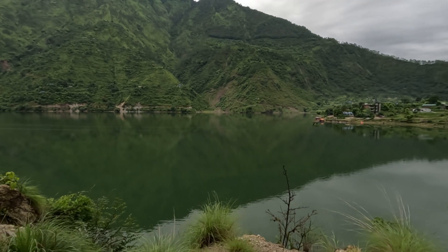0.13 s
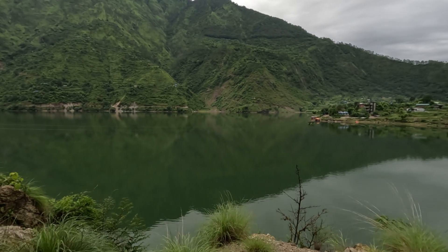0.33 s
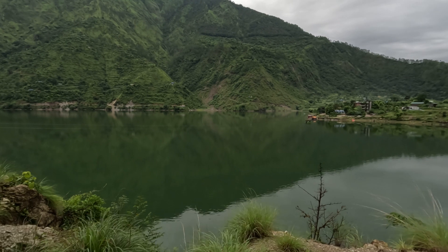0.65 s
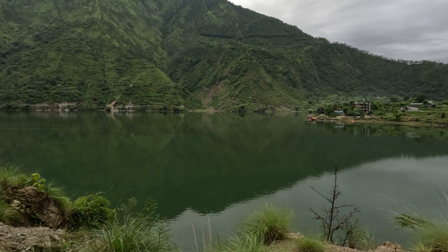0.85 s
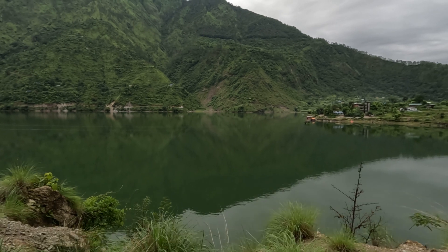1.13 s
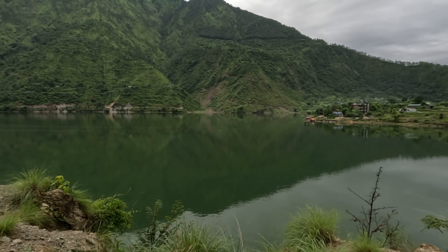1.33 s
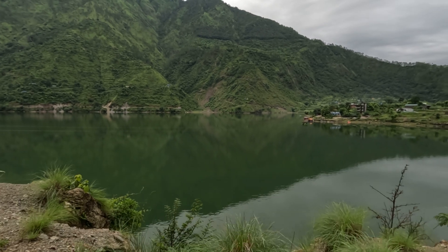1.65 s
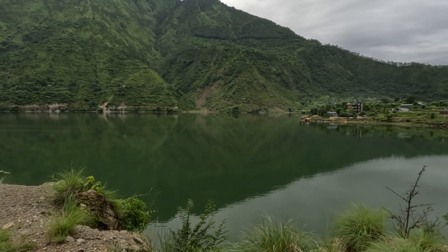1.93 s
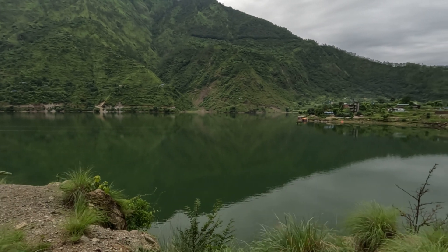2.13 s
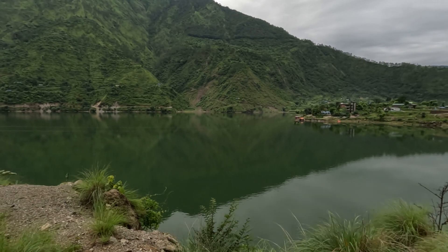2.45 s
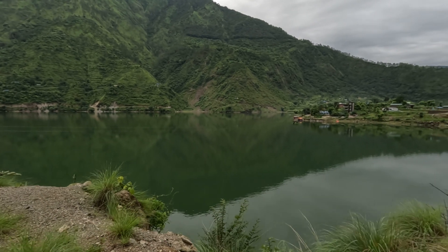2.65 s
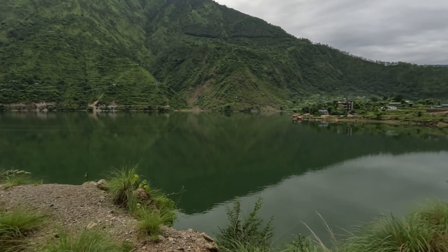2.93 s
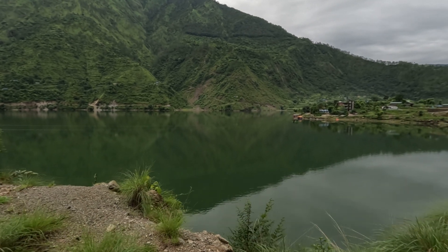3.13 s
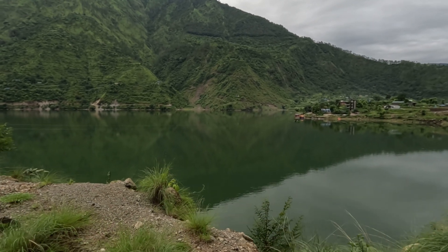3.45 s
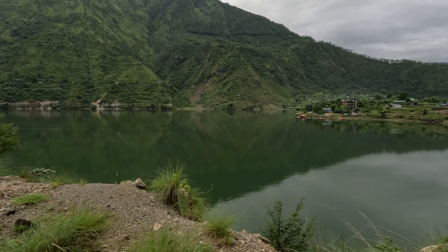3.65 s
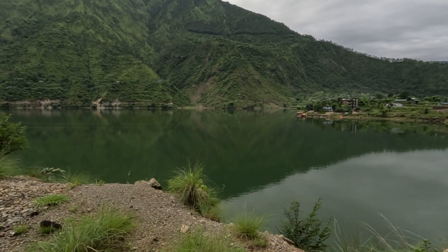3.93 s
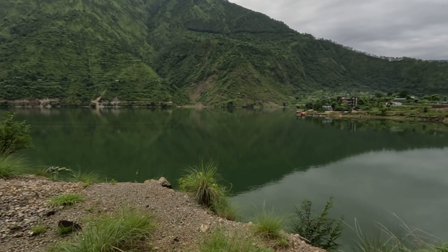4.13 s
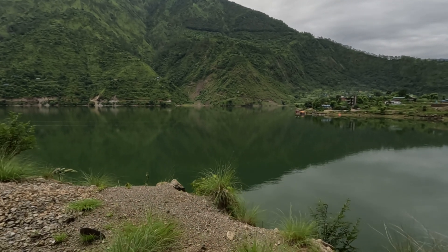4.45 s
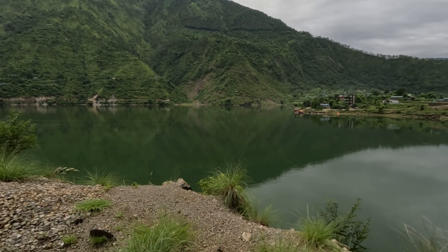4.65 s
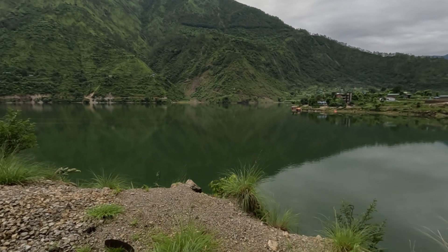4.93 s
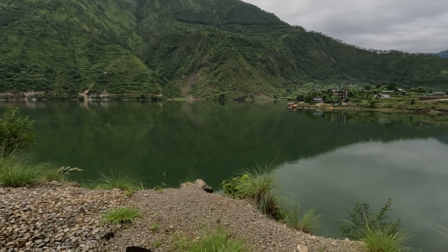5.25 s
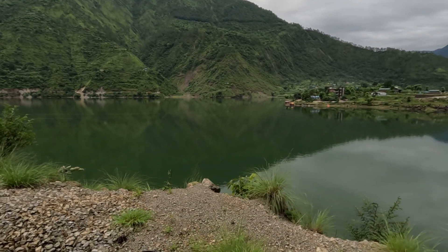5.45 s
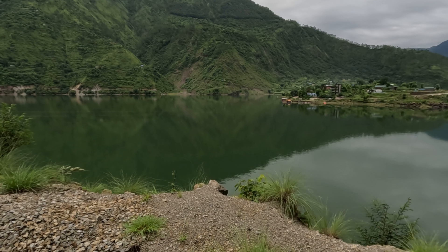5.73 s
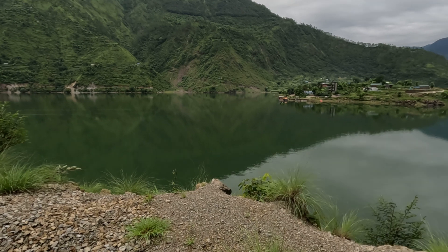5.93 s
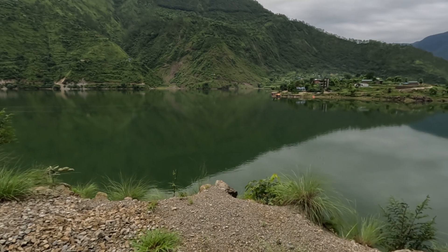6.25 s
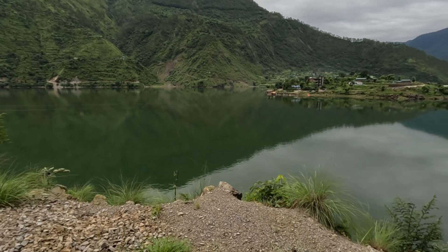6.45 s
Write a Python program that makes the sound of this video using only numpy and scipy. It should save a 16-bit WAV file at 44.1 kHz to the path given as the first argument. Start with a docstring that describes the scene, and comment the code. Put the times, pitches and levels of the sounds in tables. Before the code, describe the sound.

Someone walks steadily on loose grit and small stones outdoors, heel and toe crunching, beneath a constant thin, high whine of crickets.

```python
"""A near cricket chirps over a farther chorus, grass and rumbling air: arching tones over coloured noise.
From about half a second, even steps crush grit on a lakeside path: clumped ringing grains, knocked pebbles, thuds.
A far bird twitters in gliding sines; a lower cricket joins at 1.5 s, and the near one falls behind by 2.7 s.
The steps and chorus go on to the end; from mid-scene trouser cloth swishes faintly in swells of noise."""
import sys
import numpy as np
from scipy import signal
from scipy.fft import rfft, irfft, next_fast_len
from scipy.io import wavfile
from scipy.ndimage import uniform_filter1d

SR = 44100
rng = np.random.default_rng(int(sys.argv[2]) if len(sys.argv) > 2 else 0)


def int16_out(signal):
    """Quantize to a 16-bit WAV file."""
    q = np.round(np.clip(np.atleast_2d(signal).T, -1, 1) * 32767)
    wavfile.write(sys.argv[1], SR, q.astype(np.int16))


N = 290619
TIME = np.arange(N) / SR

# footfalls: [heel t/s, toe t/s, heel attack/s, heel crunch level/dB, toe crunch level/dB,
#             heel sand level/dB, toe sand level/dB, sole scuff level/dB, air sway level/dB]
FOOTFALLS = [(0.549, 0.634, 0.014, -53, -52, -55.5, -55, -56.5, -53),
             (1.128, 1.215, 0.0052, -44.5, -50, -50, -60, -49.5, -45.5),
             (1.752, 1.832, 0.031, -47, -51, -62, -56, -52, -51.5),
             (2.347, 2.440, 0.031, -46.5, -51, -59, -59, -49.5, -54),
             (2.914, 3.019, 0.011, -43.5, -54, -47.5, -60, -47, -65),
             (3.545, 3.648, 0.0086, -47, -43.5, -54, -54, -52, -51.5),
             (4.14, 4.271, 0.0089, -44, -47.5, -52, -52, -49, -58),
             (4.799, 4.886, 0.014, -40, -75, -50.5, -66, -51, -51.5),
             (5.408, 5.534, 0.022, -51, -48.5, -62, -51, -52, -55),
             (6.099, 6.201, 0.015, -46.5, -55.5, -57.5, -63, -51.5, -52)]
# pebble knocks: [t/s, peak level/dB before panning, ring f/Hz, left over right/dB, ring length/cycles]
PEBBLE_KNOCKS = [(0.052, -36, 3500, 6, 5.5), (0.394, -30.5, 3070, 5, 8.4), (0.448, -33.5, 3000, 7, 3),
                 (0.516, -33, 5500, 5, 3.3), (0.587, -35, 1190, 10, 3.7), (0.625, -31, 2940, 2, 3.1),
                 (0.797, -47.5, 350, 4.5, 6.4), (0.895, -38.5, 3830, 3, 9.3), (1.022, -32, 2260, 6, 3.5),
                 (1.095, -32.5, 4050, 2, 3.7), (1.116, -31, 585, 5, 4.1), (1.131, -22.5, 3940, 1, 6.1),
                 (1.16, -22.5, 1350, 6, 1.4), (1.22, -32.5, 1780, 6.5, 2.6), (1.665, -31, 2520, 9, 6),
                 (1.671, -27.5, 2800, 2, 4.9), (1.748, -26.5, 970, 9, 3.9), (1.813, -32.5, 1900, 10, 6.4),
                 (1.926, -35, 1080, 7, 2.4), (2.326, -32.5, 2020, 12, 1.9), (2.366, -33.5, 416, 3, 3.3),
                 (2.379, -35.5, 1280, 16, 2), (2.416, -26, 2230, 6.5, 6.7), (2.443, -25.5, 1934, 11, 3),
                 (2.916, -30.5, 780, 10, 2.1), (2.942, -31, 2980, 8, 3.5), (3.011, -31.5, 5200, -4, 3),
                 (3.315, -33, 1425, 1, 16), (3.543, -39.5, 552, 5, 4.1), (3.627, -23, 3400, 1, 6),
                 (3.641, -19.5, 2600, 3, 5.6), (4.164, -32, 2130, 15, 3), (4.18, -35, 1010, 10, 6.8),
                 (4.24, -31, 1490, 5, 3.1), (4.271, -18, 2090, 6, 4.4), (4.801, -26.5, 3000, 8, 4.5),
                 (4.889, -33, 1870, 5, 8.7), (5.095, -26.5, 2330, 5.5, 2.5), (5.496, -34.5, 1380, 7, 7.5),
                 (5.539, -37, 2660, -4, 4), (6.087, -30.5, 1440, 4, 9.7), (6.191, -33, 1290, 4.5, 11),
                 (6.269, -31, 1190, 5, 4.2), (6.387, -23.5, 6000, 1, 3.6), (6.392, -47.5, 406, 1, 5),
                 (6.484, -24, 1320, 4.5, 4), (6.506, -40, 1210, 0, 15), (6.511, -42.5, 370, 1, 11)]
# soft low thuds: [t/s, drive level/dB, f/Hz, spread/s]
WEIGHT_THUDS = [(0.074, -49.5, 30, 0.052), (0.215, -44, 107, 0.043), (0.53, -50.5, 169, .012),
                (1.255, -44, 78, 0.028), (1.385, -44.5, 32.2, 0.014), (1.9, -50.5, 65, 0.06),
                (2.385, -40.5, 73, 0.025), (2.625, -49, 200, 0.0076), (2.92, -49.5, 156, 0.014),
                (3.555, -44.5, 184, 0.015), (4.095, -40.5, 69.1, 0.01), (4.362, -50.5, 170, 0.0083),
                (4.816, -49.5, 162, 0.022), (5.509, -38.5, 77.5, 0.011), (6.258, -48.5, 79, 0.032),
                (6.465, -44.5, 55, 0.0072)]
# trouser legs brushing past each other: [t/s, level/dB, spread/s]
CLOTH_SWISHES = [(3.34, -58, 0.035), (4.65, -65, 0.041), (5.75, -63.5, 0.062), (6.447, -62.5, 0.041)]
# swinging leg brushing the grass: [t/s, level/dB before the hiss and tick mix, spread/s]
LEG_BRUSHES = [(0.008, -57.5, 0.13), (0.316, -61, 0.063), (0.439, -54.5, 0.08), (0.709, -63, 0.03),
               (1.096, -57.5, 0.034), (1.312, -61, 0.1), (1.68, -58, 0.17), (1.914, -63.5, 0.042),
               (2.163, -64.5, 0.099), (2.51, -61.5, 0.049), (2.755, -58.5, 0.057), (3.13, -68.5, 0.086),
               (3.365, -65.5, 0.091), (3.722, -59, 0.03), (3.96, -70.5, 0.24), (4.33, -62, 0.035),
               (4.687, -68, .04), (4.955, -59, 0.02), (5.11, -69.5, 0.06), (5.29, -66.5, 0.14),
               (5.57, -60.5, 0.035), (5.95, -68.5, .06), (6.294, -59.5, 0.054), (6.552, -56, 0.033)]
# dry grass stems snapping by the left ear: [t/s, peak level/dB before panning]
STEM_SNAPS = [(.301, -49), (0.349, -43), (0.899, -44.5), (1.713, -53), (1.951, -52), (2.015, -43.5),
              (3.015, -54), (5.054, -49), (6.299, -56)]
# runs of the nearest cricket: [first chirp t/s, last chirp t/s]
NEAR_CRICKET_RUNS = [(0.015, 0.326), (0.477, 0.709), (0.859, 1.327), (1.475, 1.475), (1.626, 2.251),
                     (2.404, 2.404), (2.525, 2.68)]
# its level as the walker passes and leaves it behind: [t/s, level/dB]
NEAR_CRICKET_LEVEL = [(0, -50.5), (0.46, -50.5), (0.6, -46.5), (0.86, -46), (1.12, -53), (1.65, -45.5),
                      (2.1, -53.5), (2.42, -51), (2.7, -63)]
# runs of the lower cricket: [first chirp t/s, last chirp t/s, level/dB]
LOWER_CRICKET_RUNS = [(1.512, 1.762, -56.5), (2.369, 3.27, -54.5), (3.381, 4.22, -55), (4.32, 4.659, -56),
                      (4.73, 5.655, -55.5), (5.746, 6.081, -59), (6.176, 6.502, -57.5)]
# one wing stroke at even moments: [f/Hz from the top pitch, level/dB]
WING_STROKE = [(-380, -44), (-170, -12.5), (-31, -8.5), (10, -3.5), (-39, 2.5), (-260, 2.5), (-540, -11),
               (-850, -80)]
# level of the cricket chorus along the way: [t/s, level/dB]
CHORUS_LEVEL_PATH = [(0, -55), (0.75, -58), (1.4, -59.5), (2.1, -56.5), (3.2, -58), (4.5, -58.5),
                     (5.8, -60.5), (6.59, -60)]
# far bird whistles: [centre t/s, length/s, start f/Hz, end f/Hz, level/dB]
BIRD_WHISTLES = [(0.842, .08, 3650, 3670, -71), (0.927, 0.026, 3650, 4000, -62),
                 (.952, 0.023, 2980, 2870, -62), (1.985, 0.029, 3850, 3800, -66),
                 (2.026, 0.063, 3600, 3240, -65), (2.089, 0.087, 3400, 3240, -65),
                 (2.128, .05, 3100, 2730, -65)]

# tone colours of grit, sand, scuffed soil, thud rumble and cloth: [f/Hz, relative level/dB per Hz]
CRUNCH_COLOUR = [(500, -40), (800, -15), (1050, 6.5), (1600, 3), (2700, 3), (3800, -2.5), (6000, -49),
                 (15000, -72)]
SAND_COLOUR = [(2000, -12), (3500, 6), (5500, 9), (7500, 2.5), (9000, -8), (12000, -6), (15000, -31)]
SCUFF_COLOUR = [(120, 7), (220, 0), (400, -6.5), (700, -5), (1100, -7.5), (2000, -38), (8000, -55)]
THUD_COLOUR = [(30, 10), (70, -2.5), (150, -0.5), (230, -6.5), (400, -20), (900, -69)]
CLOTH_COLOUR = [(600, -55), (1050, -12), (1350, 10), (1550, 6), (1900, -22), (3000, -3), (6000, -77)]
# tone colours of wind, valley hum, grass and very distant crickets: [f/Hz, relative level/dB per Hz]
WIND_COLOUR = [(20, 5.5), (35, -8), (50, -10), (75, -27.5), (130, -31.5), (400, -70)]
VALLEY_COLOUR = [(40, -22.5), (100, -9.5), (180, 3), (270, -6.5), (420, -7), (750, -15.5), (1200, -8),
                 (3000, -43.5)]
GRASS_COLOUR = [(500, -8.5), (850, -13), (1200, -1), (2000, -2), (3200, -3.5), (4500, -9.5), (6500, -7.5),
                (9000, -21.5), (12000, -23), (15000, -47)]
HAZE_COLOUR = [(6200, -28), (7000, -5), (7400, 3.5), (7700, 4), (8100, -10), (8500, -11), (9200, -31),
               (11000, -66)]
# left-right likeness of steps and air, held within 0 to 0.99 in use: [f/Hz, likeness]
STEP_WIDTH = [(200, 0.8), (1500, .93), (4000, 0.74), (8000, 1.1), (12000, -6.5)]
AIR_WIDTH = [(30, 0.56), (200, 0.74), (1500, 0.45), (5000, .5), (12000, 0.025)]
# stereo balance of steps and air: [f/Hz, left over right/dB]
STEP_BALANCE = [(60, -3.5), (150, -0.5), (300, -1.5), (600, 5.5), (2000, 8.5), (4000, 2), (7500, 1.5),
                (10000, 3), (12000, 23)]
AIR_BALANCE = [(30, -0.5), (160, -2), (500, -1), (1500, 3), (4000, 2), (8000, -4), (10000, 6.5),
               (12000, 24)]

HEEL_FADE_S, TOE_ATTACK_S, TOE_FADE_S = 0.056, 0.026, 0.021  # time constants of the two contacts
SCUFF_FADE_S, TOE_SCUFF_DB = 0.036, -15  # the toe scuffs less than the heel
SWAY_LAG_S, SWAY_SPREAD_S, BREEZE_DB = 0.058, 0.077, -53.5  # the body sways after the toe lands
GRASS_DB = -68  # grass left alone, before the hiss and tick mix
STROKE_S, NEAR_PERIOD_S, LOWER_PERIOD_S = 0.052, 0.078, 0.084  # periods stretch slightly to fit each run
TICKS_PER_S, TICK_DB = 30, -70.5
CUTOFF_HZ = 15100


def from_db(db):
    """Turn decibels into an amplitude gain."""
    return 10 ** (np.asarray(db) / 20)


def rms_one(x):
    """Bring a sound to an rms level of one."""
    return x / np.sqrt(np.mean(x ** 2) + 1e-20)


def at_hz(points, hz):
    """Read a table on a log-frequency axis."""
    f, value = np.transpose(points)
    return np.interp(np.log(np.maximum(hz, 1)), np.log(f), value)


def at_time(points, t):
    """Read a level path in dB at time t."""
    return np.interp(t, *np.transpose(points))


def panned(pan_db):
    """Left and right gains with a mean of one; positive dB leans left."""
    gains = from_db(np.array([[.5], [-.5]]) * pan_db)
    return gains / gains.mean(axis=0)


def drift(rate):
    """Smooth random wander of rms 1, with rate knots per second."""
    knots = rng.standard_normal(1024)
    return rms_one(np.interp(TIME * rate, np.arange(len(knots)), knots))


def coloured(sources, spectrum, likeness, pan):
    """Two unrelated sources become one stereo sound with a causal tone colour; rms 1."""
    size = next_fast_len(N + 8192)
    hz = np.arange(size // 2 + 1) * SR / size
    # folding the cepstrum forward makes the filter causal; the overall gain is normalised below
    cepstrum = irfft(np.log(from_db(at_hz(spectrum, hz))), size)
    tone = np.exp(rfft(2 * cepstrum[:size // 2], size))
    tone = tone * hz / np.hypot(hz, 15)  # roll off below 15 Hz
    alike = np.clip(at_hz(likeness, hz), 0, .99)
    mid, side = rfft(sources, size)
    pair = np.sqrt(1 + alike) * mid + np.sqrt(1 - alike) * side * [[1], [-1]]
    stereo = pair * tone * panned(at_hz(pan, hz))
    return rms_one(irfft(stereo, size)[:, :N])


def air(spectrum):
    """Diffuse smooth noise."""
    return coloured(rng.standard_normal((2, N)), spectrum, AIR_WIDTH, AIR_BALANCE)


def grains(spectrum, per_s, spread_db):
    """Tiny fractures clump, many weak and a few strong; each rings briefly at the pitch of its own grain."""
    born = rng.random(N) < per_s * from_db(3 * drift(70)) / SR
    clicks = born * from_db(spread_db * np.minimum(rng.exponential(1, N), 4))
    # even out the local power so the contacts alone shape the level
    clicks /= np.sqrt(np.abs(uniform_filter1d(clicks ** 2, size=2000)) + 1e-4)
    clicks = clicks * rng.choice([-1, 1], (2, N))
    pitches_hz = np.geomspace(350, 8500, num=10)
    kinds, out = rng.integers(0, len(pitches_hz), N), 0
    for kind, hz in enumerate(pitches_hz):
        body = signal.butter(1, [hz / 1.25, hz * 1.25], "band", fs=SR)
        out = out + signal.lfilter(*body, clicks * (kinds == kind) + 1e-18)
    return coloured(out, spectrum, STEP_WIDTH, STEP_BALANCE)


def add(out, sound, s):
    """Mix a short sound in at time s."""
    start = int(round(s * SR))
    first, last = max(start, 0), min(start + sound.shape[-1], N)
    if last > first:
        out[..., first:last] += sound[..., first - start:last - start]


def scatter(x, t60, wet_db):
    """Ground and grass return a short diffuse tail, different at each ear."""
    t = np.arange(SR // 4) / SR
    tail = rng.standard_normal((2, len(t))) * from_db(-60 * t / t60)
    tail /= np.sqrt(np.sum(tail ** 2, axis=1, keepdims=True))
    return x + from_db(wet_db) * signal.fftconvolve(np.atleast_2d(x), tail, axes=1)[:, :N]


def contact(s, attack_s, fade_s):
    """Pressure builds up to time s and dies away."""
    return np.exp(-np.minimum(np.maximum((s - TIME) / attack_s, (TIME - s) / fade_s), 20))


def swell(s, spread_s):
    """A smooth rise and fall around time s."""
    return np.exp(-np.minimum(.5 * ((TIME - s) / spread_s) ** 2, 20))


def beats(first, last, period):
    """Evenly spaced moments from first to last."""
    return np.linspace(first, last, 1 + int(round(abs(last - first) / period)))


def cricket(chirps, top_hz, wobble_hz, fade_db=0):
    """Each wing stroke speeds up and slows down, so its near-pure tone arches in pitch as it fades."""
    stroke, out = np.linspace(0, 1, int(STROKE_S * SR)), np.zeros(N)

    def along(values):
        """Spread values evenly over the stroke."""
        return np.interp(stroke, np.linspace(0, 1, len(values)), values)

    bend_hz, shape_db = map(along, np.transpose(WING_STROKE))
    for at, db in chirps:
        hz = top_hz + bend_hz + wobble_hz * along(rng.standard_normal(size=24))
        tone = np.sqrt(2) * np.sin(2 * np.pi * np.cumsum(hz) / SR)
        level = from_db(db + shape_db - fade_db * (stroke - .5))
        add(out, level * tone, at - STROKE_S / 2)
    return out


def breeze():
    """Air rumbles on the microphone, more as the walker sways after each step; the valley hums behind."""
    flow = from_db(BREEZE_DB)
    for _, toe_s, *_, sway_db in FOOTFALLS:
        flow = flow + from_db(sway_db) * swell(toe_s + SWAY_LAG_S, SWAY_SPREAD_S)
    hum_level = from_db(-64.5 + 2.0 * drift(12))
    return flow * air(WIND_COLOUR) + hum_level * air(VALLEY_COLOUR)


def bird():
    """Short gliding, wavering whistles, smeared by distance."""
    out = np.zeros(N)
    for s, length, start_hz, end_hz, db in BIRD_WHISTLES:
        hz = np.linspace(start_hz, end_hz, int(length * SR))
        hz = hz + 1200 * uniform_filter1d(rng.standard_normal(len(hz)), size=100)
        whistle = np.hanning(len(hz)) * np.sin(2 * np.pi * np.cumsum(hz) / SR)
        add(out, from_db(db) * whistle, s - length / 2)
    return scatter(out, t60=.25, wet_db=2)


def chorus():
    """Farther crickets keep their own pitch and pace; the farthest merge into a shimmer."""
    out = np.zeros((2, N))
    for top_hz in np.linspace(7350, 8300, num=6):
        level_db = -abs(top_hz - 7600) / 58  # strongest near 7600 Hz
        period_s = rng.uniform(.075, .09)
        times = period_s * (np.arange(92) - rng.random() + rng.normal(0, .04, 92))
        chirps = zip(times, level_db + rng.normal(0, 2.5, len(times)))
        song = cricket(chirps, top_hz, wobble_hz=30, fade_db=4)
        out += song * panned(2.5 + rng.normal(0, 1.5))
    songs = rms_one(scatter(out, t60=.08, wet_db=-8))
    shimmer = air(HAZE_COLOUR) * panned(6.9)
    return rms_one(songs + from_db(-2) * shimmer)


def grass():
    """Dry blades hiss and tick, louder whenever a leg brushes through them."""
    power = from_db(GRASS_DB) ** 2
    for s, db, spread_s in LEG_BRUSHES:
        power = power + (from_db(db) * swell(s, spread_s)) ** 2
    blade_ticks = grains(GRASS_COLOUR, per_s=600, spread_db=5.8)
    return np.sqrt(power) * (from_db(0.5) * air(GRASS_COLOUR) + from_db(-3.5) * blade_ticks)


def ticks():
    """Single grains roll loose and dry blades spring back in tiny noise bursts."""
    out, t = np.zeros(N), np.arange(256) / SR
    band = signal.butter(3, [1100, 6000], "band", fs=SR, output="sos")
    count = int(TICKS_PER_S * TIME[-1])
    for s, db in rng.uniform([0, -14], [TIME[-1], 0], (count, 2)):
        crack = rng.standard_normal(len(t)) * np.exp(-t / .001)
        add(out, from_db(db) * signal.sosfilt(band, crack), s)
    return from_db(TICK_DB) * rms_one(out) * panned(1.3)


def stems(low_hz, high_hz, fade_s):
    """A brittle stem gives way with a tiny bright crackle."""
    out, t = np.zeros(N), np.arange(512) / SR
    band = signal.butter(2, [low_hz, min(high_hz, SR / 2.5)], "band", fs=SR, output="sos")
    for s, peak_db in STEM_SNAPS:
        snap = signal.sosfilt(band, rng.standard_normal(len(t)) * np.exp(-t / fade_s))
        add(out, from_db(peak_db) * snap / np.abs(snap).max(), s)
    return out * panned(10.5)


def close_crickets():
    """Two crickets sing right by the path, each chirp a little louder or softer than the last."""
    near = [(at, at_time(NEAR_CRICKET_LEVEL, at) + rng.normal(0, 1))
            for first, last in NEAR_CRICKET_RUNS
            for at in beats(first, last, NEAR_PERIOD_S)]
    lower = [(at, db + rng.normal(0, 1))
             for first, last, db in LOWER_CRICKET_RUNS
             for at in beats(first, last, LOWER_PERIOD_S)]
    high = scatter(cricket(near, top_hz=7840, wobble_hz=30, fade_db=13), t60=0.02, wet_db=-8.0)
    low = scatter(cricket(lower, top_hz=7535, wobble_hz=20, fade_db=20), t60=.03, wet_db=-11)
    return high * panned(3.8) + low * panned(5.7)


def trousers():
    """Cloth swishes faintly as the trouser legs brush past each other."""
    level = sum(from_db(db) * swell(s, spread_s) for s, db, spread_s in CLOTH_SWISHES)
    return air(CLOTH_COLOUR) * level


def thuds():
    """The walker's weight comes down with a dull push and a short rumble."""
    push, rumble = np.zeros((2, N))
    t = np.arange(-SR // 4, SR // 4) / SR
    for s, db, hz, spread_s in WEIGHT_THUDS:
        weight = from_db(db) * np.exp(-.5 * (t / spread_s) ** 2)
        add(rumble, weight, s + t[0])
        add(push, weight * np.exp(-np.abs(t) * hz) * np.sin(2 * np.pi * hz * t), s + t[0])
    noise = coloured(rng.standard_normal((2, N)), THUD_COLOUR, STEP_WIDTH, STEP_BALANCE)
    return push * panned(6.6) + from_db(-4.0) * rumble * noise


def pebbles(rattle_db, rattle_s, dull_hz):
    """A pebble snaps against its neighbour, rings for a few cycles and settles with tiny rebounds."""
    out, t = np.zeros((2, N)), np.arange(2048) / SR
    dull = signal.butter(4, dull_hz, fs=SR, output="sos")
    for s, peak_db, hz, pan_db, cycles in PEBBLE_KNOCKS:
        rebounds = rng.standard_normal(len(t)) * (rng.random(len(t)) < .04)
        push = rebounds * from_db(rattle_db) * np.exp(-t / rattle_s)
        push[0] = 1  # the first snap
        r = from_db(-60 * hz / (max(cycles, 1.5) * SR))  # falls 60 dB over the ring length
        knock = signal.lfilter([1, -1], [1, -2 * r * np.cos(2 * np.pi * hz / SR), r * r], push)
        band = signal.butter(2, [hz / 3, min(hz * 1.67, SR / 3)], "band", fs=SR, output="sos")
        knock = signal.sosfilt(dull, signal.sosfilt(band, knock))
        add(out, from_db(peak_db) * knock / np.abs(knock).max() * panned(pan_db), s + .001)
    return scatter(out, t60=0.11, wet_db=-11.0)


def footsteps():
    """The heel lands, then weight rolls onto the toe; both crush grit and fine sand and scuff the soil."""
    crunch, sand, scuff = np.zeros((3, N))
    for heel_s, toe_s, attack_s, heel_db, toe_db, heel_sand_db, toe_sand_db, scuff_db, _ in FOOTFALLS:
        heel = contact(heel_s, attack_s, HEEL_FADE_S)
        toe = contact(toe_s, TOE_ATTACK_S, TOE_FADE_S)
        heel_scuff = contact(heel_s, attack_s, SCUFF_FADE_S)
        crunch += from_db(heel_db) * heel + from_db(toe_db) * toe
        sand += from_db(heel_sand_db) * heel + from_db(toe_sand_db) * toe
        scuff += from_db(scuff_db) * (heel_scuff + from_db(TOE_SCUFF_DB) * toe)
    grit = grains(CRUNCH_COLOUR, per_s=2800, spread_db=5.2)
    dust = grains(SAND_COLOUR, per_s=4500, spread_db=4.5)
    soil = grains(SCUFF_COLOUR, per_s=2600, spread_db=3.0)
    return crunch * grit + sand * dust + scuff * soil


def scene():
    """The air, the animals, the grass and the walker together."""
    insects = from_db(at_time(CHORUS_LEVEL_PATH, TIME)) * chorus() + close_crickets()
    plants = grass() + ticks() + stems(low_hz=6400, high_hz=11600, fade_s=0.0012)
    stones = pebbles(rattle_db=-16, rattle_s=0.0053, dull_hz=6200)
    walker = trousers() + thuds() + stones + footsteps()
    return breeze() + bird() + insects + plants + walker


def record(dry):
    """A steep elliptic low-pass cuts the top."""
    return signal.sosfilt(signal.ellip(10, .2, 80, CUTOFF_HZ, fs=SR, output="sos"), dry)


dry = scene()
out = record(dry)
int16_out(out)
```